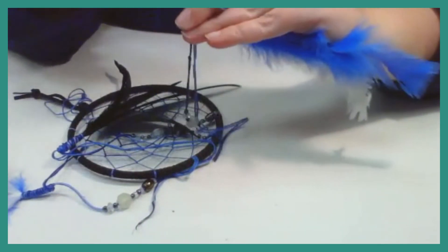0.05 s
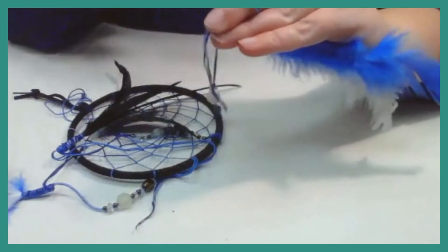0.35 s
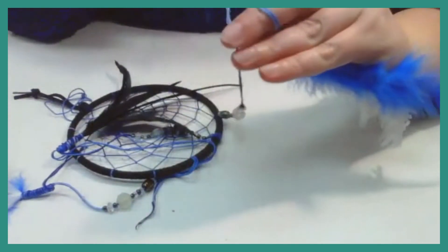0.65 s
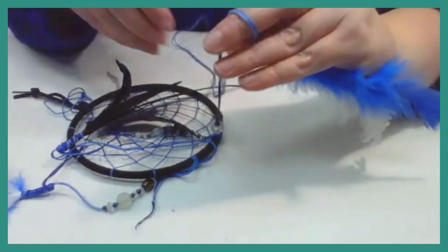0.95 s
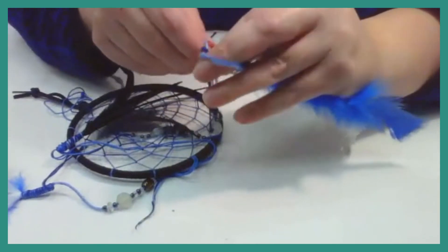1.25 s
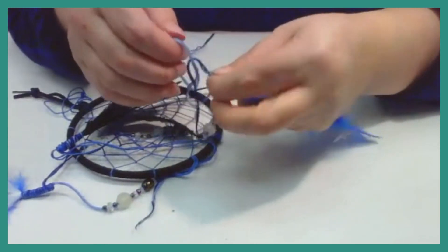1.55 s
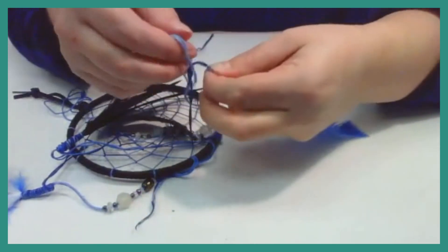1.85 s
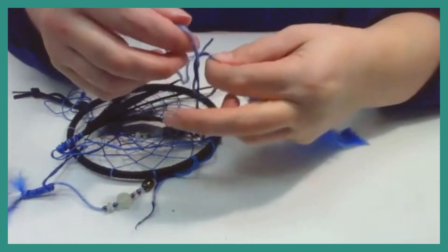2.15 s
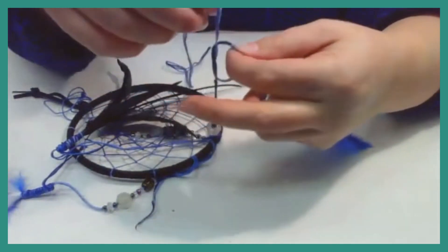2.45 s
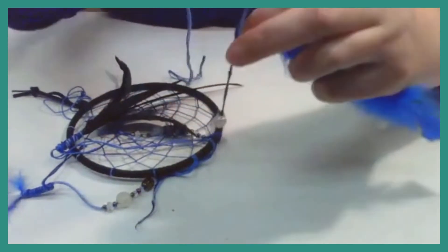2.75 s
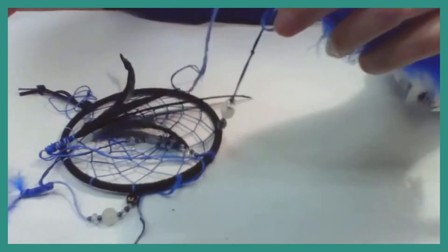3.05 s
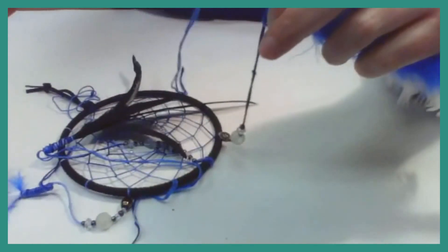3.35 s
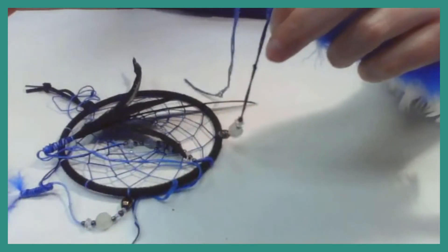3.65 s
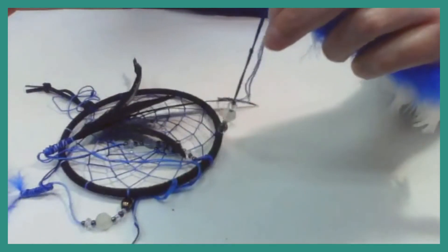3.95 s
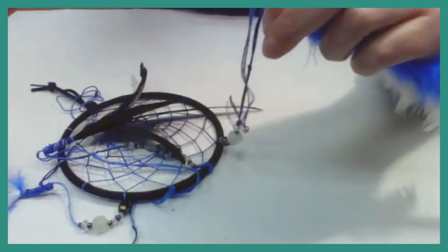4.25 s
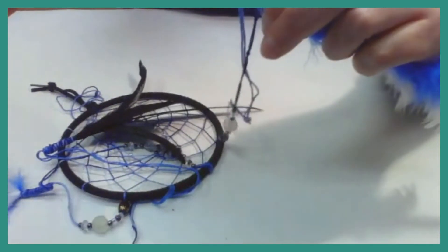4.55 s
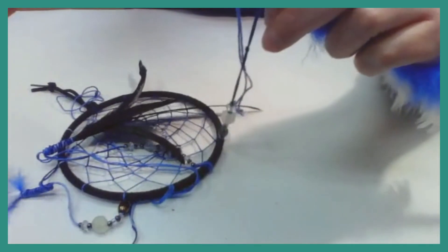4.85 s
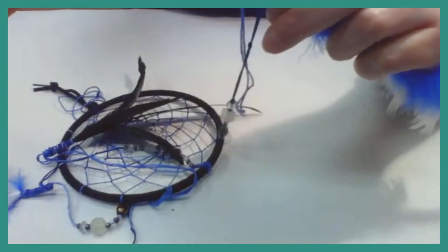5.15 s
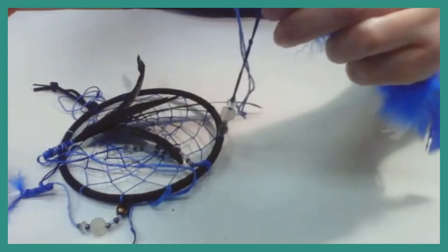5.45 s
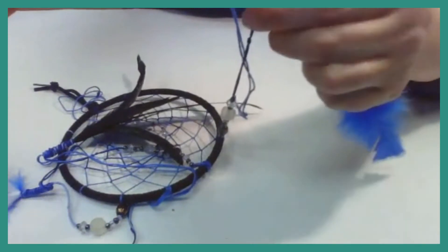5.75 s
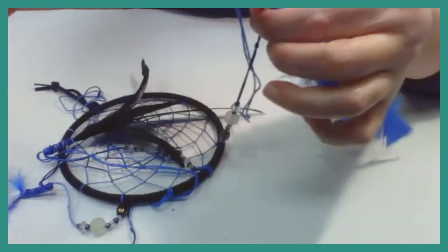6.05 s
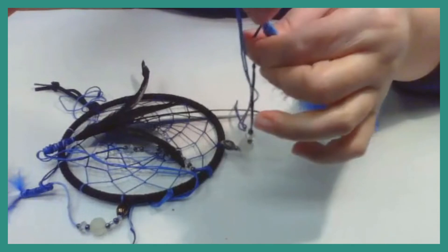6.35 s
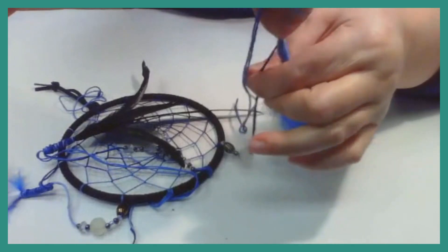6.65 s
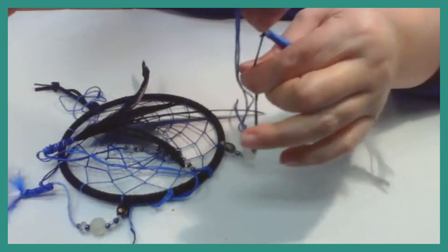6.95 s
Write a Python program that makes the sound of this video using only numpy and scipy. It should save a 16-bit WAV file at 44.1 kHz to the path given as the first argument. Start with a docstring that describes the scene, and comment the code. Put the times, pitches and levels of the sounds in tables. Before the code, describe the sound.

Quiet close handling of thread and a small beaded hoop: light rustles, a thud on the table, sharp ticks and a thin rasp over ventilation rumble.

```python
"""Hands knot a thread on a small beaded, feathered hoop at a table, heard by one microphone in a quiet room.
Over steady ventilation rumble and mains hum, a sleeve brushes the table and the hoop scrapes on it.
Soft knocks excite the table's modes, thread and feather swish between the fingertips, beads and nails
tick, and at 1.7 s the heaviest knock thuds. At 2.3 s the thread is pulled hard through the knot, rasping
by stick-slip friction. Lighter slides, scrapes, swishes, ticks and knocks follow."""
import sys
import numpy as np
from scipy import signal
from scipy.fft import rfft, irfft
from scipy.io import wavfile
from scipy.ndimage import uniform_filter1d

SR = 44100
rng = np.random.default_rng(int(sys.argv[2]) if len(sys.argv) > 2 else 0)


def file_out(sig):
    """Save sig as 16-bit WAV at sys.argv[1]."""
    # one column per channel
    cols = np.atleast_2d(sig).T
    # limit, then scale
    lim = np.clip(cols, -1, 1)
    pcm = np.round(lim * 32767).astype(np.int16)
    wavfile.write(sys.argv[1], SR, pcm)


N = 313551
TIME = np.arange(N) / SR


def from_db(db):
    """Amplitude ratio of a level in decibels."""
    return 10 ** (np.asarray(db) / 20)


def rms_one(x):
    """Normalisation to unit rms."""
    return x / np.sqrt(np.mean(x ** 2) + 1e-20)


def peak_one(x):
    """Normalisation to unit peak."""
    return x / np.abs(x).max()


def at_hz(points, hz):
    """Interpolation on a log-frequency axis."""
    freqs, values = np.transpose(points)
    return np.interp(np.log(np.maximum(hz, 1)), np.log(freqs), values)


def coloured(x, spectrum):
    """Source-filter model: a spectral envelope shapes an excitation; rms 1."""
    gain = from_db(at_hz(spectrum, np.arange(N // 2 + 1) * SR / N))
    return rms_one(irfft(rfft(x) * gain, N))


def butter(x, hz, kind, order=2):
    """Causal Butterworth filter."""
    return signal.sosfilt(signal.butter(order, np.clip(hz, 10, .48 * SR), kind, fs=SR, output="sos"), x)


def add(track, s, sound):
    """Superposition of a sound on a track from time s."""
    start = int(np.clip(round(s * SR), 0, N - 1))
    track[start:start + len(sound)] += sound[:N - start]


def stroke(s, db, rise_s, fall_s, hold_s=0):
    """Amplitude envelope of a movement peaking at time s; rise and fall each span 20 dB."""
    away = np.maximum((s - TIME) / rise_s, 0) + np.maximum((TIME - s - hold_s) / fall_s, 0)
    return from_db(db - 20 * np.minimum(away, 10) ** 1.24)   # the exponent rounds the peak


def strokes(rows):
    """Incoherent addition: the powers of several movements sum to one envelope."""
    return np.sqrt(sum(stroke(*row) ** 2 for row in rows))


def friction(spectrum, snags_per_s, spread_db, smooth):
    """Stick-slip friction: fibres catch and release as random impulses over a smooth hiss; rms 1."""
    sizes = from_db(spread_db * np.minimum(rng.exponential(1, N), 4)) * rng.choice([-1, 1], N)
    snags = rms_one(sizes * (rng.random(N) < snags_per_s / SR))
    return coloured(snags + smooth * rng.standard_normal(N), spectrum)


# spectra of the ventilation and the hiss: f/Hz, relative level/dB
RUMBLE_SPECTRUM = [(20, -50), (50, -29), (70, -27), (88, -6), (102, 1.5), (118, 6), (135, -1.5), (190, -6),
                   (270, -23.5), (400, -23), (560, -38.5), (900, -76), (2000, -53)]
HISS_SPECTRUM = [(300, -4.5), (750, 6), (950, 0), (1300, 6.5), (1700, -1.5), (3000, -7), (4500, -3),
                 (6000, 0.5), (8300, 5), (10000, -1), (14000, 1.5), (16000, -3.5)]
# slow wavering of the rumble: t/s, relative level/dB
RUMBLE_DRIFT = [(0, 2), (.7, -.5), (1.3, -2), (1.85, 2.5), (2.7, -1.5), (3.4, 1), (4.1, .5), (4.7, -3),
                (5.15, 1.5), (5.7, -2), (6.3, -1), (7.1, 0)]
# mains harmonics: f/Hz, rms level/dB
HUM_PARTIALS = [(119.8, -58.5), (239.7, -69), (359.8, -72)]
def background(rumble_db=-47, hiss_db=-63.5):
    """Noise floor: continuous spectra of ventilation and hiss, with the line spectrum of mains hum."""
    rumble = coloured(rng.standard_normal(N), RUMBLE_SPECTRUM)
    rumble /= np.sqrt(uniform_filter1d(rumble ** 2, size=SR // 2))   # even out the power over 0.5 s
    rumble *= from_db(rumble_db + np.interp(TIME, *np.transpose(RUMBLE_DRIFT)))
    hum = sum(np.sqrt(2) * from_db(db) * np.sin(2 * np.pi * (hz * TIME + rng.random()))
              for hz, db in HUM_PARTIALS)
    hiss = from_db(hiss_db) * coloured(rng.standard_normal(N), HISS_SPECTRUM)
    return rumble + hum + hiss


# cloth on a moving arm, and a sleeve on the table: peak t/s, level/dB, rise/s, fall/s
RUSTLE_STROKES = [(.23, -55, 0.44, 0.5), (1.55, -61.5, 1.7, 2.6)]
BRUSH_STROKES = [(0, -45, .1, 0.15), (.16, -53.5, 0.16, 0.15), (.39, -65.5, 0.38, 0.16),
                 (1.28, -63, 0.32, 1.2), (1.8, -59, 0.19, 0.47), (2.3, -68.5, 0.89, 2.7),
                 (3.39, -59, 0.1, 0.19), (4.48, -82, 0.06, 0.073)]
# their spectra: f/Hz, relative level/dB
RUSTLE_SPECTRUM = [(800, -14.5), (2000, -6.5), (3100, -11.5), (4100, -3.5), (5500, -3.5), (7000, 0.5),
                   (9000, -3.5), (11000, -7), (15000, -10)]
BRUSH_SPECTRUM = [(120, -12.5), (270, 3), (470, 1.5), (650, -14), (950, -7.5), (1280, -4), (1650, -9),
                  (2200, -6.5), (3000, -19.5), (4200, -16), (7000, -20), (14000, -41)]
def sleeves():
    """Friction of cloth radiates broadband noise: a bright rustle, and a duller brush on the table."""
    rustle = friction(RUSTLE_SPECTRUM, snags_per_s=1900, spread_db=4.5, smooth=1.3)
    brush = friction(BRUSH_SPECTRUM, snags_per_s=700, spread_db=-4.0, smooth=0.99)
    return strokes(RUSTLE_STROKES) * rustle + strokes(BRUSH_STROKES) * brush


def resonance(x, hz, width_hz):
    """Driven response of a damped resonator whose natural frequency varies in time; rms 1."""
    turn = np.exp(2j * np.pi * np.cumsum(hz) / SR)
    pole = np.exp(-np.pi * width_hz / SR)
    return rms_one((turn * signal.lfilter([1], [1, -pole], x / turn)).real)


# scrapes of the hoop on the table: peak t/s, level/dB, rise/s, fall/s
SCRAPE_STROKES = [(.02, -51, 0.065, 0.14), (.4, -61, .04, .1), (1.52, -67, 0.12, .1),
                  (2.305, -55, 0.046, 0.026), (2.368, -57, 0.017, 0.034), (3.383, -53, 0.02, 0.014),
                  (3.435, -53.5, .025, 0.072), (3.495, -55, 0.069, 0.11), (3.59, -59, 0.086, 0.16),
                  (4.5, -65, 0.062, .07)]
# spectrum of the drag: f/Hz, relative level/dB
DRAG_SPECTRUM = [(80, -18), (250, 2), (450, 2), (700, -6), (950, -17), (1250, 8), (1600, -9), (2200, -6),
                 (3000, -40)]
# modes of the hoop: f/Hz, bandwidth/Hz, relative level/dB
HOOP_RESONANCES = [(390, 53, 4), (458, 45, 1), (1310, 59, -7), (2040, 120, -21)]
# tuning of those modes: t/s, frequency ratio
HOOP_TUNING = [(2.3, 0.99), (3.42, 0.924), (3.53, 1.03), (3.7, 1.03)]
def hoop(grit_db=2):
    """Forced vibration: scraping drives hollow modes, which dip, then rise as the thread tightens."""
    drag = friction(DRAG_SPECTRUM, snags_per_s=400, spread_db=1.5, smooth=0.8)
    tuning = np.interp(TIME, *np.transpose(HOOP_TUNING))
    rings = sum(from_db(db) * resonance(drag, hz * tuning, width) for hz, width, db in HOOP_RESONANCES)
    return strokes(SCRAPE_STROKES) * rms_one(rings + from_db(grit_db) * drag)


# modes of the table: f/Hz, relative level/dB, T60/s
TABLE_MODES = [(243, -8.5, 0.23), (325, -8, 0.11), (398, -26, 0.34), (439, -0.5, 0.15), (543, -6, 0.022),
               (573, -21, 0.16), (740, -8, 0.086), (900, -18, 0.11), (1182, -3.5, 0.063),
               (1320, 0.5, 0.041), (1600, 4, 0.011), (1772, 2, 0.026), (2090, 1.5, 0.044), (2360, 2, 0.022),
               (3130, -2, 0.012), (3680, -1, 0.0067), (4170, 5.5, 0.032), (4920, 6.5, 0.0088),
               (6630, 14, 0.025)]
# blows: t/s, level/dB, low-pass f/Hz, contact time/s; struck spot's f/Hz, relative level/dB, T60/s
TABLE_BLOWS = [(0.177, -40.5, 2900, 0.002, 1860, 0, 0.014), (0.3623, -37.5, 2200, 0.0018, 615, 1.5, 0.017),
               (0.3638, -50, 2360, 0.0028, 2390, -6, 0.069), (1.1881, -39.5, 1940, .0012, 1197, 17, 0.035),
               (1.19, -42, 600, .0027, 360, 15.5, 0.026), (1.2317, -42.5, 2000, 0.0026, 340, 2.5, .06),
               (1.7049, -31, 2900, 0.016, 1180, -9, .03), (1.7064, -28.5, 2400, 0.003, 507, -13, 0.04),
               (1.7235, -22, 5050, 0.0024, 715, -7, 0.024), (1.7263, -27, 1550, 0.0034, 453.6, -3.5, 0.12),
               (2.257, -47.5, 3000, 0.0022, 2210, 0, 0.016), (2.296, -47, 2200, 0.0027, 1140, 0, 0.029),
               (3.401, -46, 600, .004, 236, 11, 0.13), (3.69, -55, 2400, .0022, 1350, -2, 0.05),
               (4.443, -52.5, 2300, 0.0024, 1870, 2, 0.026), (4.516, -56, 1200, 0.0025, 410, 7, 0.037),
               (6.595, -52.5, 597, 0.0033, 413, -1, 0.034), (6.603, -55.5, 2260, 0.0024, 1830, -2, .015),
               (6.99, -52.5, 2200, 0.0013, 1400, -9, 0.019), (7.103, -39, 6540, .0013, 1630, 1.5, .015)]
def knocks(scuff=0.1, crack_db=-1):
    """Impact excitation: table and struck spot ring in damped modes; softer blows are duller."""
    out, t = np.zeros(N), TIME[:SR // 3]
    body = sum((-1) ** k * from_db(db - 60 * t / t60) * np.sin(2 * np.pi * hz * t)
               for k, (hz, db, t60) in enumerate(TABLE_MODES))
    for s, db, bright_hz, contact_s, spot_hz, spot_db, spot_t60 in TABLE_BLOWS:
        grit = butter(rng.standard_normal(len(t)), [600, 6000], "band") * np.exp(-t / contact_s)
        force = scuff * grit
        force[0] += 1
        ring = peak_one(signal.fftconvolve(force, body)[:len(t)])
        blow = peak_one(butter(ring + from_db(crack_db) * grit, bright_hz, "low", order=6))
        spot = from_db(spot_db - 60 * t / spot_t60) * np.sin(2 * np.pi * spot_hz * t)
        add(out, s, from_db(db) * peak_one(blow + spot))
    return butter(out, 110, "high")


# reflections from the table top and hands: delay/s, relative level/dB
NEAR_REFLECTIONS = [(.0007, -45), (.0019, -12.5), (.0046, -9), (.0083, -39)]
def near_echoes(x):
    """Comb filtering: early reflections interfere with the direct sound and ripple its spectrum; rms 1."""
    return rms_one(x + sum(from_db(db) * np.roll(x, round(s * SR)) for s, db in NEAR_REFLECTIONS))


# rubs between the fingertips: peak t/s, level/dB, rise/s, fall/s, feather's share of the power
FINGER_STROKES = [(.21, -64, .25, .21, .4), (.505, -55.5, .06, .05, 0.8), (1.82, -62, 0.28, .22, 0.3),
                  (3.262, -55.5, 0.1, 0.082, 0.4), (3.405, -56, .05, .06, .35),
                  (3.572, -59, .025, .025, .8), (3.7, -62, .15, .3, .6), (3.75, -59, .03, .03, .7),
                  (3.995, -56, .08, .05, .9), (4.028, -57, .03, .04, 0.8), (4.168, -57.5, 0.028, .04, .5),
                  (4.275, -59, 0.037, 0.044, 0.5), (4.355, -64, 0.059, 0.044, .5),
                  (4.436, -56, .012, .045, 0.4), (5.21, -61, .09, .09, .9), (5.936, -47.5, 0.03, .04, 0.8),
                  (6.668, -55.5, .035, .04, 0.4), (6.71, -50, 0.042, .05, 0.8),
                  (6.747, -42, 0.036, 0.033, 0.87), (6.777, -53, .025, 0.06, 0.7)]
# spectra of thread on skin and of feather barbs: f/Hz, relative level/dB
SKIN_SPECTRUM = [(2000, -22), (4000, -8), (5800, -7.5), (7500, 1.5), (9000, -2), (11000, -1.5),
                 (16000, -9.5)]
BARB_SPECTRUM = [(2000, -31), (5500, -19), (7500, -6.5), (11000, -4.5), (12500, -1), (14200, 2.5),
                 (16000, -5.5)]
def swishes():
    """Two friction noises add in power: duller thread on skin and brighter, crackling feather barbs."""
    skin_power = barb_power = 0
    for s, db, rise_s, fall_s, feather in FINGER_STROKES:
        power = stroke(s, db, rise_s, fall_s) ** 2
        skin_power += (1 - feather) * power
        barb_power += feather * power
    skin = friction(SKIN_SPECTRUM, snags_per_s=4000, spread_db=1.5, smooth=0.83)
    barbs = friction(BARB_SPECTRUM, snags_per_s=2000, spread_db=6.5, smooth=1.0)
    return np.sqrt(skin_power) * near_echoes(skin) + np.sqrt(barb_power) * near_echoes(barbs)


# contacts of beads and fingernails: t/s, level/dB, f/Hz, bandwidth/Hz, rattle gain, reflection gain
HARD_CONTACTS = [(0.8537, -35.5, 12800, 8000, .15, .2), (2.2168, -17.5, 10900, 7250, 0.04, .45),
                 (2.2304, -35, 9000, 7000, .15, .4), (2.252, -26.5, 7400, 2500, .35, .4),
                 (2.392, -30, 9600, 8000, .05, .2), (3.412, -29.5, 9400, 8400, 0.09, .2),
                 (3.6143, -27, 12800, 6800, .01, 0.2), (3.6208, -36, 13000, 6300, .012, .1),
                 (5.6508, -37, 14000, 5000, .04, .3), (5.971, -42, 9600, 7000, .14, .3),
                 (5.982, -40, 13000, 6000, 0.13, .3), (6.9186, -21, 6780, 3600, 0.021, 0.22)]
def ticks(reflection_s=0.0005, rattle_s=0.0057):
    """Heavily damped impulse response: a hard contact rings briefly and reflects off the table top."""
    out, t = np.zeros(N), TIME[:SR // 40]
    for s, db, hz, width, rattle, reflection in HARD_CONTACTS:
        excitation = rattle * rng.standard_normal(len(t)) * np.exp(-t / rattle_s)
        excitation[0] += 1
        excitation[round(reflection_s * SR)] += reflection
        tick = butter(excitation, [hz - width / 2, hz + width / 2], "band")
        add(out, s, from_db(db) * peak_one(tick))
    return out


def thud(start_hz=848, end_hz=341, glide_s=0.0049, attack_s=0.0044, t60_s=0.054):
    """Dispersion: the heaviest blow's high bending waves cross the table first, so the pitch falls."""
    out, t = np.zeros(N), TIME[:SR // 4]
    hz = end_hz + (start_hz - end_hz) * np.exp(-t / glide_s)
    envelope = from_db(-25 - 60 * t / t60_s) * (1 - np.exp(-t / attack_s))
    add(out, s=1.7235, sound=envelope * np.sin(2 * np.pi * np.cumsum(hz) / SR))
    return out


def zip_tone(centre_hz=8580, width_hz=300, wander_hz=79.9):
    """Narrow-band noise: the thread's twist rubs past the knot, its pitch wandering with speed; rms 1."""
    wander = rms_one(butter(rng.standard_normal(N), 10, "low"))
    phase = 2 * np.pi * np.cumsum(centre_hz + wander_hz * wander) / SR
    in_phase, quadrature = butter(rng.standard_normal((2, N)), width_hz / 2, "low")
    return rms_one(in_phase * np.cos(phase) + quadrature * np.sin(phase))


# slides through the loose knot: peak t/s, level/dB, rise/s, fall/s
SLIDE_STROKES = [(2.33, -45, 0.22, 0.53), (2.6, -55, 0.22, 0.099), (2.95, -62.5, 0.24, 0.62),
                 (3.39, -57.5, 0.79, 0.2), (7.0, -64, 0.5, 1)]
# spectra of thread in the loose and in the tight knot: f/Hz, relative level/dB
SLIDE_SPECTRUM = [(1500, -14), (3000, -14.5), (5600, -7), (6300, 0), (6900, -2), (7550, 3), (8000, 1.5),
                  (9500, 3), (10200, -0.5), (11400, 1), (13500, -0.5), (16000, -5.5)]
PULL_SPECTRUM = [(1500, -39), (3000, -37), (4000, -21), (5200, -16), (5700, -16), (6250, 1), (6550, 3.5),
                 (6850, -10), (7250, 1.5), (7900, -6.5), (8600, -5.5), (10000, -8.5), (14000, -13),
                 (16000, -20)]
def thread(judder_db=0.7, zip_db=-8):
    """Stick-slip in the knot: uneven grip modulates one hard pull; lighter slides rasp with a thin zip."""
    judder = rms_one(butter(rng.standard_normal(N), [50, 160], "band"))
    grip = from_db(judder_db * judder)
    tug = stroke(s=2.285, db=-36.5, rise_s=0.08, fall_s=0.059, hold_s=0.087)
    pull = tug * grip * near_echoes(friction(PULL_SPECTRUM, snags_per_s=2000, spread_db=1.5, smooth=0.5))
    rasp = near_echoes(friction(SLIDE_SPECTRUM, snags_per_s=2500, spread_db=3.0, smooth=0.8))
    return pull + strokes(SLIDE_STROKES) * (rasp + from_db(zip_db) * zip_tone())


# reverberation time of the room: f/Hz, T60/s
REVERB_TIMES = [(150, 0.46), (500, 0.56), (1500, 0.43), (3000, .33), (5000, 0.34), (14000, 0.24)]
def room(x, gap_s=0.0073):
    """Diffuse reverberation: octave bands of noise decay exponentially, the highest fastest."""
    t = TIME[:SR * 3 // 4]
    edges = np.geomspace(70, 18000, 9)
    tail = np.zeros(len(t))
    for low, high in zip(edges, edges[1:]):
        t60 = at_hz(REVERB_TIMES, np.sqrt(low * high))
        tail += butter(rng.standard_normal(len(t)), [low, high], "band") * from_db(-60 * t / t60)
    tail *= t > gap_s
    return signal.fftconvolve(x, tail / np.linalg.norm(tail))[:N]


def scene():
    """Superposition of close sources; only the knocks and, more faintly, the ticks reverberate."""
    beads, table = ticks(), knocks() + thud()
    reverb = room(from_db(-17) * beads + from_db(-10) * table)
    mono = thread() + swishes() + sleeves() + hoop() + beads + table + reverb + background()
    return np.stack([mono, mono])


def record(dry):
    """Band limiting: a steep elliptic low-pass cuts the treble above 15750 Hz."""
    return signal.sosfilt(signal.ellip(12, .1, 80, 15750, fs=SR, output="sos"), dry)


dry = scene()
out = record(dry)
file_out(out)
```